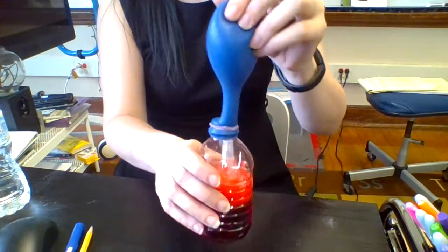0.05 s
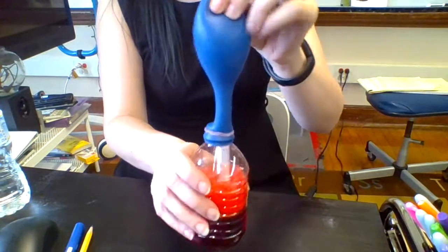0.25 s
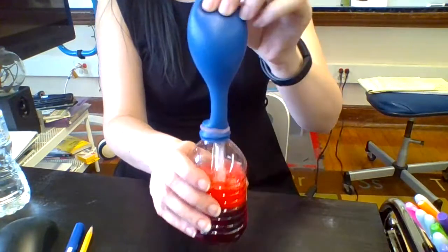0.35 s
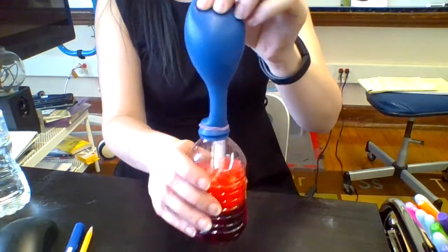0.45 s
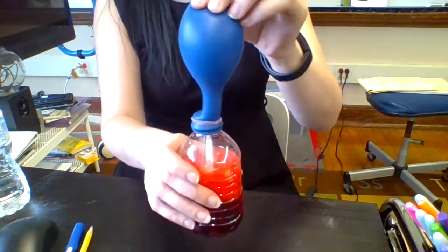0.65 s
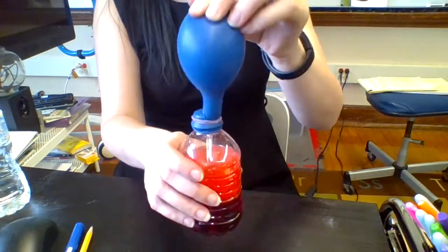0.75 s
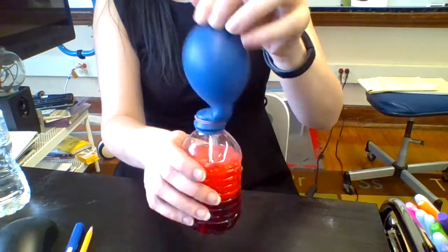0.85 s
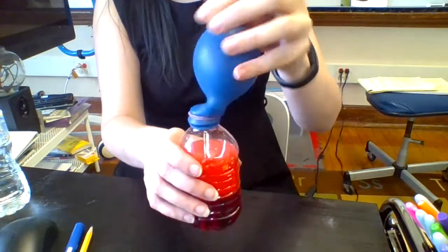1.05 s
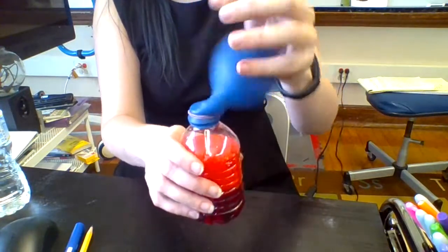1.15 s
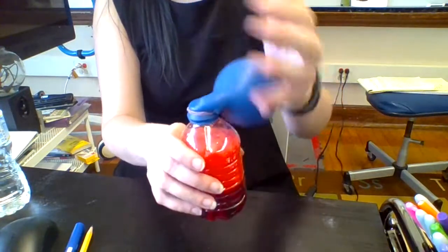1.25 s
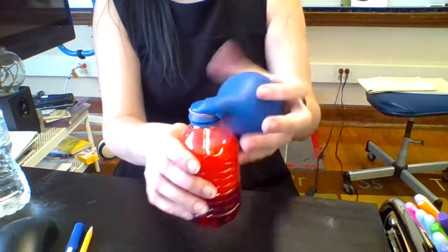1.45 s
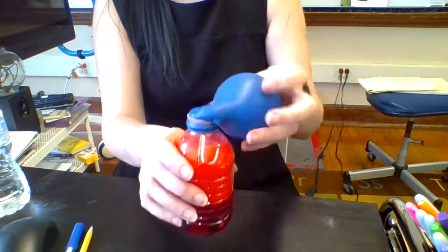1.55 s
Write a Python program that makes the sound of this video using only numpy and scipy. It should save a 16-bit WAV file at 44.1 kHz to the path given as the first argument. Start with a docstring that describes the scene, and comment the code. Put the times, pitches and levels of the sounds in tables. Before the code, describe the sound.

One sharp snap comes from a rubber balloon being handled on a plastic bottle in a quiet room. The bottle then gives a few light taps and dull bumps against a table, with faint rubbing of fingers.

```python
"""A balloon on a bottle

Fingers stretch a balloon on the neck of a plastic drink bottle at a table in a quiet room.
The rubber sticks and slips with a faint creak, then gives one sharp snap. Light taps ring the bottle,
and the balloon's neck folds over with a scrape and a soft double bump.
A small room echoes, over faint rustling, low rumble and hiss."""
import sys
import numpy as np
from scipy import signal
from scipy.fft import rfft, irfft, next_fast_len
from scipy.io import wavfile

SR = 44100
rng = np.random.default_rng(int(sys.argv[2]) if len(sys.argv) > 2 else 0)


def dump_mix(stems):
    """Bounce the given channels to the path in sys.argv[1] as a 16-bit WAV at rate SR."""
    frames = np.atleast_2d(stems).T  # one column per channel
    limited = np.clip(frames, -1, 1)  # hard clip at full scale
    pcm = np.round(limited * 32767).astype(np.int16)
    wavfile.write(sys.argv[1], SR, pcm)


N = 70560


def amp(db):
    """Turn decibels (dB) into a number to multiply a sound by."""
    return 10 ** (np.asarray(db) / 20)


def along(points, hz):
    """Read a curve of (Hz, value) points at hz, with octaves evenly spaced."""
    freqs, values = np.transpose(points)
    return np.interp(np.log(hz + 1), np.log(freqs + 1), values)


def filtered(x, response):
    """Turn each frequency in x up or down by the factor response(hz)."""
    size = next_fast_len(len(x) + 8192)
    return irfft(rfft(x, size) * response(np.fft.rfftfreq(size, 1 / SR)), size)[:len(x)]


def low_cut(x, hz):
    """Weaken the bass below hz."""
    return signal.sosfilt(signal.butter(2, hz, "high", fs=SR, output="sos"), x)


def noise(colour, size):
    """Noise of average strength 1, its tone shaped by (Hz, dB) points."""
    x = filtered(rng.standard_normal(size), lambda hz: amp(along(colour, hz)))
    return x / x.std()


def add(track, start_s, sound):
    """Mix a sound into the track at start_s seconds."""
    i = int(np.clip(round(start_s * SR), 0, N - 1))
    track[i:i + len(sound)] += sound[:N - i]


def ring(tones, t, rise_s):
    """Pure tones that rise together; each then fades by 60 dB over its ring time."""
    fading = sum(amp(db - 60 * t / ring_s) * np.sin(2 * np.pi * hz * t) for hz, db, ring_s in tones)
    return fading * (1 - np.exp(-t / rise_s))


# The tone of the background. Each row: frequency in Hz, relative level in dB.
BACKGROUND_COLOUR = [(12, 1), (25, -4.5), (50, -11), (100, -16.5), (200, -23.5), (420, -26.5), (800, -31),
                     (1300, -34.5), (2000, -35), (5000, -40.5), (15500, -44.5)]

def background():
    """The quiet room's steady rumble and hiss."""
    return amp(-52) * noise(BACKGROUND_COLOUR, N)


# How loud the rubbing is over time. Each row: time in seconds, level in dB.
RUB_LEVELS = [(0, -47), (.07, -57), (.16, -63), (.24, -67), (.45, -66), (.54, -63), (.6, -73.5),
              (.73, -61.5), (.79, -70.5), (0.851, -51.5), (0.905, -66), (.98, -67.5), (1.35, -67),
              (1.387, -57.5), (1.42, -68.5), (1.5, -73), (1.53, -57), (1.57, -68)]
# The tone of the rubbing. Each row: frequency in Hz, relative level in dB.
RUB_COLOUR = [(100, -8), (350, 1.5), (650, -2), (900, -7), (1300, 0), (1900, -18), (4000, -24),
              (12000, -35.5)]

def rubbing():
    """Fingers slide on the balloon with a dull rustle."""
    times, db = np.transpose(RUB_LEVELS)
    return amp(np.interp(np.arange(N) / SR, times, db)) * noise(RUB_COLOUR, N)


# The bottle's own tones. Each row: pitch in Hz, relative level in dB, ring time in seconds.
BOTTLE_TONES = [(234, 1.5, 0.0068), (430.7, 9.5, 0.027), (624, 7.5, 0.035), (774, 5.5, 0.021),
                (1157, 9, 0.026), (1350, 6.5, 0.028), (1514, -5.5, 0.035), (2190, -3, 0.026),
                (2944, 3, 0.026), (3860, 0, 0.019), (5500, -10, 0.012)]
# The tone of a tap's tick. Each row: frequency in Hz, relative level in dB.
TICK_COLOUR = [(500, -26), (3000, 11), (7000, -0.5), (9400, 0), (11000, -2), (15000, -11)]
# Taps on the bottle. Each row: start in seconds, level in dB, favoured pitch in Hz, its boost in dB,
# pitch in Hz above which tones weaken, the tick's relative level in dB, ring time multiplier.
TAPS = [(.0003, -48, 654, 11, 1400, 0, 1.3), (.0095, -53.5, 1260, 14.5, 1420, -30, 0.33),
        (0.0613, -61, 1190, 5, 1430, -35, 0.74), (0.4172, -43.5, 1890, 23, 1430, -27, 0.73),
        (.4975, -47.5, 536, 10, 1330, -30, 0.95), (0.5117, -53, 600, 8.5, 1290, -25, 0.7),
        (0.5337, -45, 1375, 10.5, 1200, -31, 0.57), (.5505, -59, 1240, 8, 1400, -25, 0.77),
        (.579, -61.5, 680, 11, 900, -23, 0.9), (0.6612, -39, 1565, 8.5, 2490, -2, 0.57),
        (.6625, -37.5, 730, 13.5, 1400, -31, 0.45), (0.6698, -46.5, 404, 5, 1090, -27, 0.72),
        (.723, -58, 1400, 1, 1400, -22, 0.69), (0.8413, -38, 231, 18, 1060, -16, 0.83),
        (0.8465, -43, 402, 18.5, 1050, -29, 0.44), (0.8784, -51, 1050, 8.5, 6000, -7.5, 0.68)]

def taps():
    """Each tap ticks and favours some of the bottle's tones; a soft one loses the high ones."""
    out, t = np.zeros(N), np.arange(SR // 10) / SR
    boost_octaves, tick_fade_s = 0.17, 0.015
    for start_s, db, favoured_hz, boost_db, soft_hz, tick_db, ring_scale in TAPS:
        tones = []
        for hz, tone_db, ring_s in BOTTLE_TONES:
            lift_db = boost_db * np.exp(-.5 * (np.log2(hz / favoured_hz) / boost_octaves) ** 2)
            loss_db = 10 * np.log10(1 + (hz / soft_hz) ** 4)
            detuned_hz = hz * (1 + rng.normal(0, 0.037))
            tones.append((detuned_hz, tone_db + lift_db - loss_db, ring_s * ring_scale))
        tick = amp(tick_db - 60 * t / tick_fade_s) * noise(TICK_COLOUR, len(t))
        add(out, start_s, amp(db) * (ring(tones, t, rise_s=0.00075) + tick))
    return low_cut(out, hz=115)  # the light bottle gives off little bass


# How long the echo lasts. Each row: frequency in Hz, seconds to fade by 60 dB.
ECHO_TIMES = [(200, 0.37), (800, 0.42), (2000, 0.62), (5500, 0.38), (14500, 0.24)]
# The tone of the echo. Each row: frequency in Hz, relative level in dB.
ECHO_COLOUR = [(100, -32), (280, 0.5), (600, -2), (1300, -2.5), (3200, -7), (7000, -4.5), (15000, -6.5)]

def room_echo(x):
    """Sound bounces quickly off nearby things, then leaves a tail that loses its treble first."""
    early_fade_s, delay_s = 0.11, 0.006
    hz, t, spectrum = signal.stft(rng.standard_normal(SR // 2), SR, nperseg=256)
    tail_db = along(ECHO_COLOUR, hz)[:, None] - 60 * t / along(ECHO_TIMES, hz)[:, None]
    tail = signal.istft(spectrum * amp(tail_db), SR, nperseg=256)[1]
    early = rng.standard_normal(len(tail)) * amp(-60 * np.arange(len(tail)) / SR / early_fade_s)
    echo = amp(-23) * tail / np.linalg.norm(tail) + amp(-17) * early / np.linalg.norm(early)
    return signal.fftconvolve(x, np.pad(echo, (int(delay_s * SR), 0)))[:N]


# Creaks of the rubber. Each row: start in seconds, length in seconds, level in dB.
CREAKS = [(0.084, 0.099, -56), (.1745, 0.023, -58)]

def creaks():
    """Stretched rubber sticks and slips; each slip is a tiny high ping."""
    out, t = np.zeros(N), np.arange(SR // 100) / SR
    slips_per_s, ping_hz, ring_s = 480, 8900, 0.0036
    for start_s, length_s, db in CREAKS:
        ramp_s = 0.18 * length_s  # time spent swelling, and again fading
        for slip_s in np.arange(0, length_s, 1 / slips_per_s):
            swell = np.sqrt(np.clip(min(slip_s, length_s - slip_s) / ramp_s, 0, 1))
            tone = (ping_hz * (1 + rng.normal(0, .022)), db + rng.normal(0, 3.0), ring_s)
            ping = swell * ring([tone], t, rise_s=.0001)
            add(out, start_s + slip_s + rng.normal(0, .0004), ping)
    return out


# The snap's tones. Each row: pitch in Hz, relative level in dB, ring time in seconds.
SNAP_TONES = [(235, -1.5, 0.0035), (795, -12.5, 0.01), (1269, -3, 0.014), (1437, -8.5, 0.015),
              (1946, -10.5, 0.012), (2333, -14, 0.017), (2935, -12.5, 0.02), (3650, -17, 0.015),
              (4430, -10.5, 0.008), (5360, -17, 0.014), (5780, -21.5, 0.013), (8160, -15.5, 0.013),
              (9570, -13, 0.01), (14900, -7.5, 0.0033)]
# The tone of its burst of noise. Each row: frequency in Hz, relative level in dB.
CRACK_COLOUR = [(900, -17), (1600, -13), (3500, -1), (7000, -8.5), (9000, -2.5), (11500, -6), (14800, 7),
                (16000, -2.5)]
# The snap's tone over all directions together. Each row: frequency in Hz, relative level in dB.
SPREAD_COLOUR = [(200, -10), (400, 1.5), (900, -1), (1350, 8.5), (1800, -1.5), (3300, 1.5), (5500, -6.5),
                 (8500, -7), (11500, -12.5), (15000, -5)]

def snap():
    """The rubber rings briefly under a bright crack. Gives the direct sound and what hits the walls."""
    ringing, crack, click = np.zeros((3, N))
    t = np.arange(SR // 10) / SR
    start_s, crack_peak_s, keep_below_hz = .2497, 0.0015, 1870
    tones = low_cut(ring(SNAP_TONES, t, rise_s=0.00026), hz=223)  # thin rubber gives off little bass
    add(ringing, start_s, amp(-3) * tones)
    burst = (t / crack_peak_s * np.exp(1 - t / crack_peak_s)) ** 2
    add(crack, start_s, amp(-15.5) * burst * noise(CRACK_COLOUR, len(t)))
    # Only the low tones keep their pitch in the room; the rest spreads as a click.
    low_ring = filtered(ringing, lambda hz: 1 / (1 + (hz / keep_below_hz) ** 4))
    add(click, start_s, amp(13) * np.ones(1))
    spread = filtered(click, lambda hz: amp(along(SPREAD_COLOUR, hz)))
    return ringing + crack, amp(-4) * low_ring + spread


# Bumps through the table. Each row: start in seconds, pitch in Hz, level in dB.
BUMPS = [(.664, 198, -42), (0.8382, 116, -33), (1.385, 87, -39)]

def bumps():
    """Short pushes into the table each make one low, dull tone."""
    out, t = np.zeros(N), np.arange(SR // 5) / SR
    ring_s = 0.041
    for start_s, hz, db in BUMPS:
        add(out, start_s, ring([(hz, db, ring_s)], t, rise_s=0.0024))
    return out


# A scrape as the balloon's neck folds, a faint swell of background hiss near 2.2 kHz, and a high wisp.
# Each row: loudest moment, swell time and fade time in seconds, pitch in Hz,
# width to either side in octaves, level in dB.
NOISE_SWELLS = [(0.838, 0.015, 0.012, 1220, .14, -49.5), (0.77, 0.0029, 0.0056, 2210, .1, -59),
                (1, .004, .002, 13800, 0.29, -53.5)]

def noise_swells():
    """Narrow bands of noise swell briefly, then die away."""
    out, t = np.zeros(N), np.arange(N) / SR
    for peak_s, swell_s, fade_s, pitch_hz, octaves, db in NOISE_SWELLS:
        hiss = rng.standard_normal(N)
        band = filtered(hiss, lambda hz: 1 / (1 + (np.log2((hz + 1) / pitch_hz) / octaves) ** 4))
        loudness = np.exp(-np.maximum((peak_s - t) / swell_s, (t - peak_s) / fade_s))
        out += amp(db) * loudness * band / band.std()
    return out


def scene():
    """Mix everything into one channel; the snap, taps, bumps and noise swells also echo."""
    soft_noise = background() + rubbing()
    direct_snap, snap_at_walls = snap()
    short_sounds = taps() + bumps() + noise_swells()
    echo = room_echo(snap_at_walls + short_sounds)
    return (soft_noise + direct_snap + short_sounds + echo + creaks())[None]


def record(dry):
    """Cut away the very highest treble."""
    top_hz, edge_hz = 15900, 300
    return np.array([filtered(x, lambda hz: np.clip((top_hz - hz) / edge_hz + .5, 0, 1)) for x in dry])


dry = scene()
out = record(dry)
dump_mix(out)
```